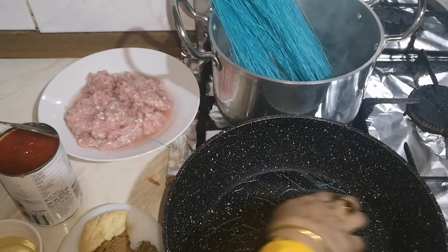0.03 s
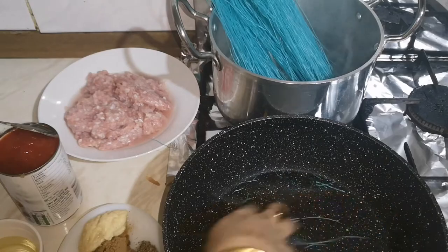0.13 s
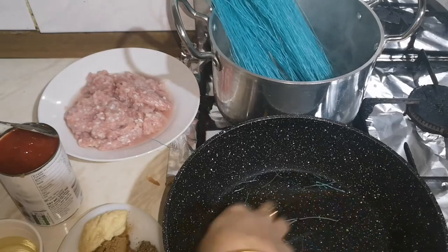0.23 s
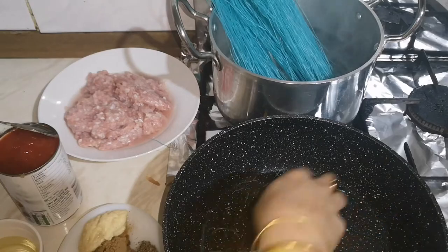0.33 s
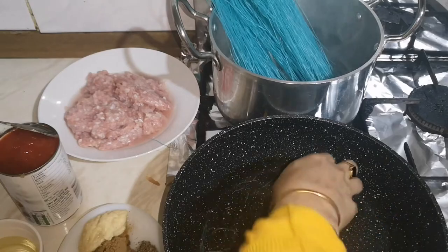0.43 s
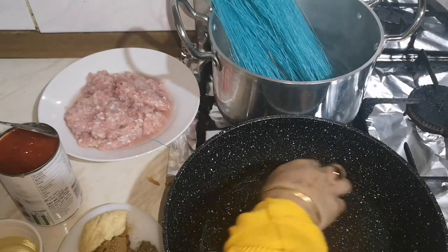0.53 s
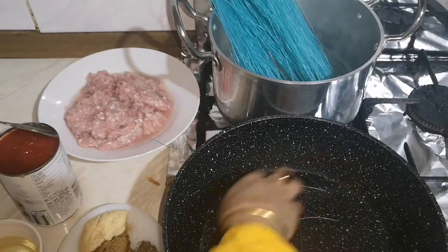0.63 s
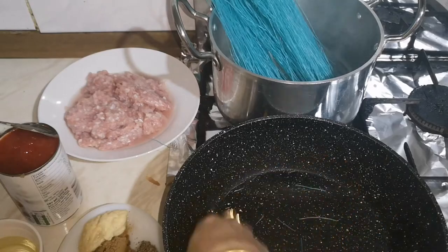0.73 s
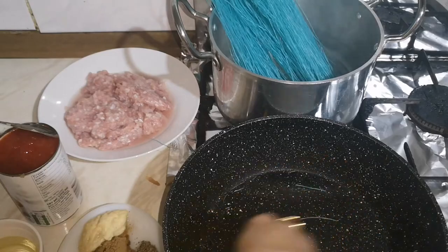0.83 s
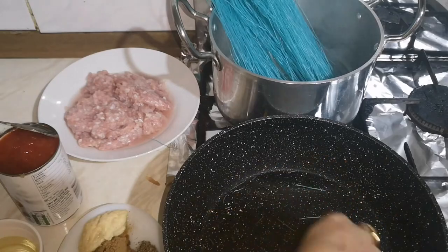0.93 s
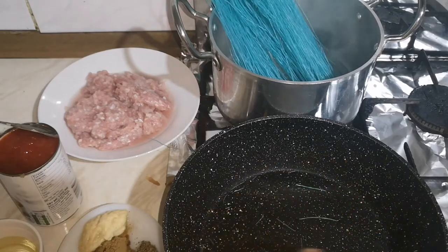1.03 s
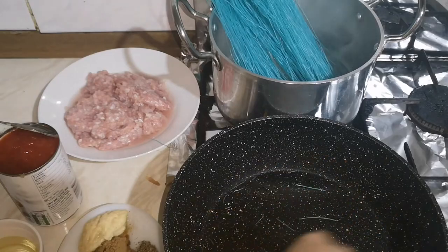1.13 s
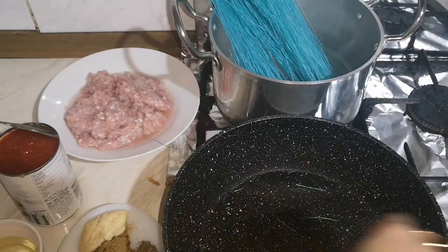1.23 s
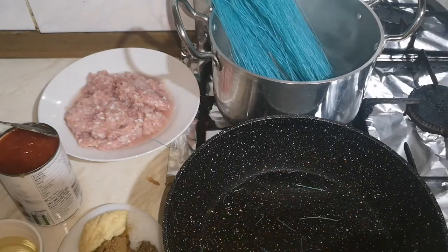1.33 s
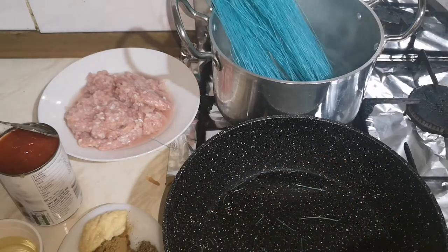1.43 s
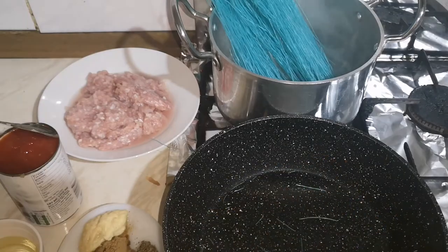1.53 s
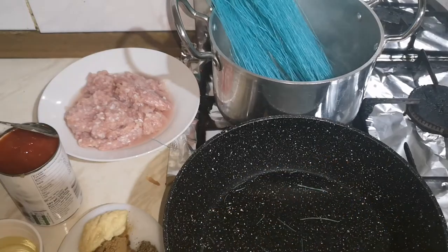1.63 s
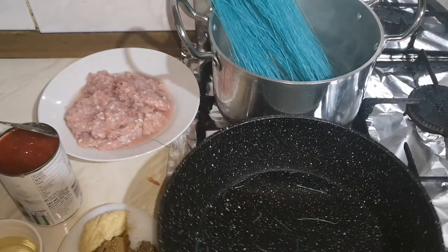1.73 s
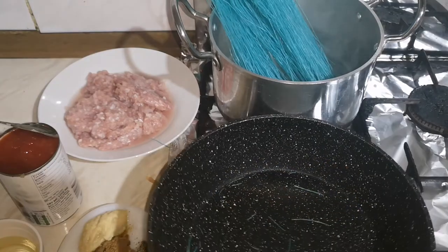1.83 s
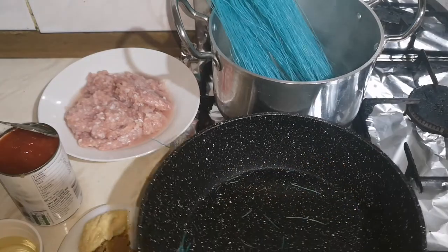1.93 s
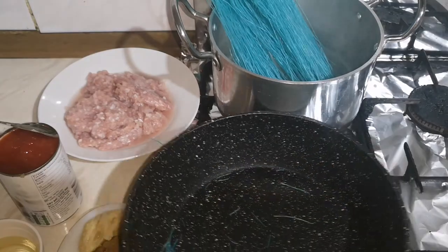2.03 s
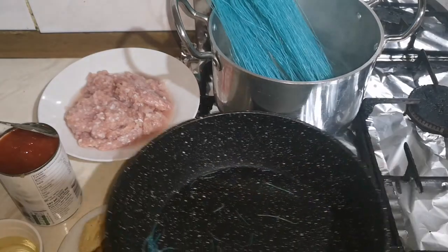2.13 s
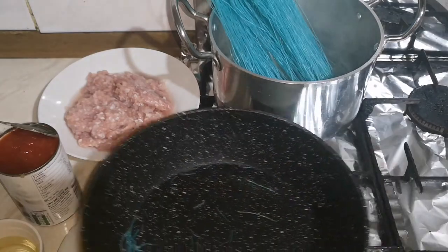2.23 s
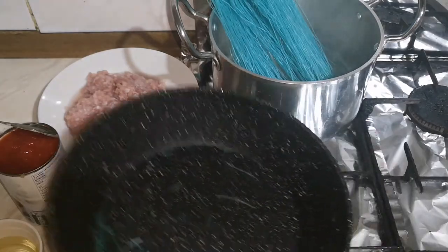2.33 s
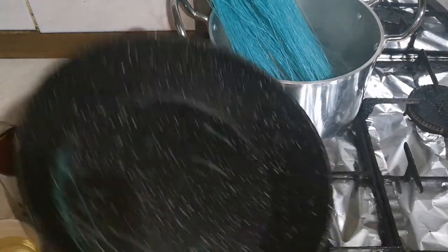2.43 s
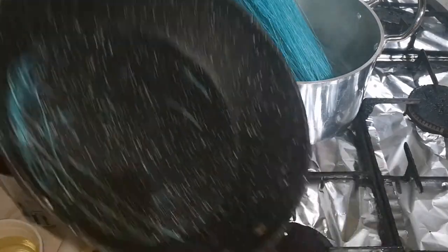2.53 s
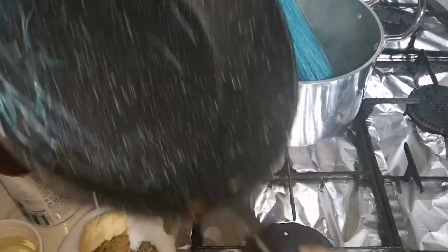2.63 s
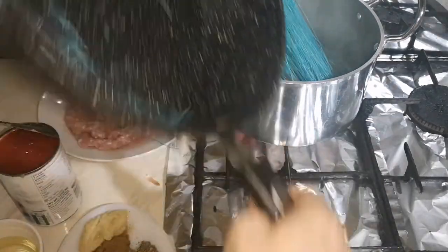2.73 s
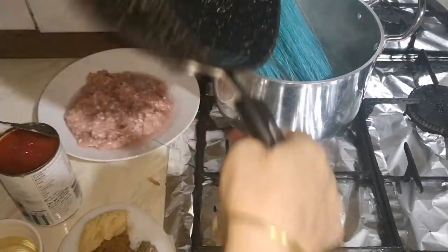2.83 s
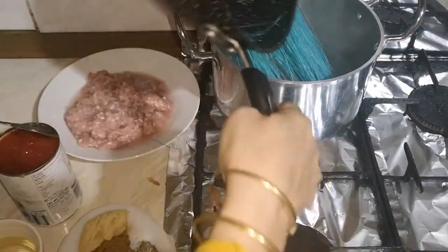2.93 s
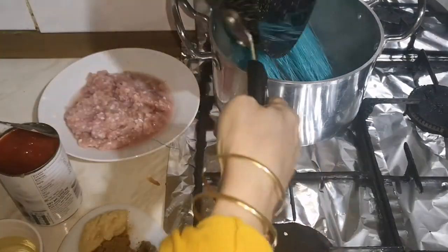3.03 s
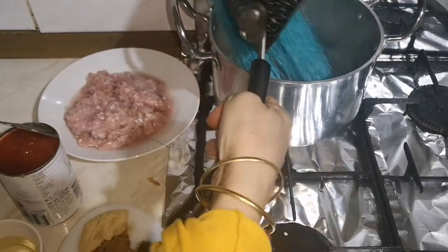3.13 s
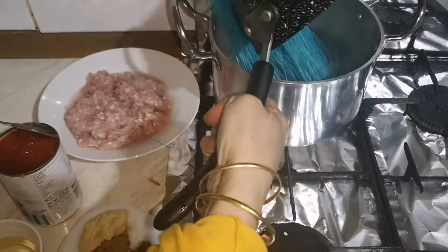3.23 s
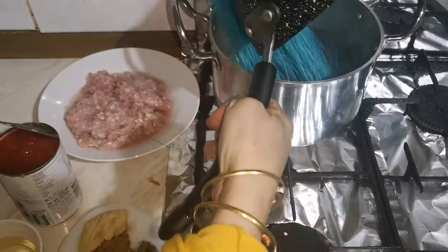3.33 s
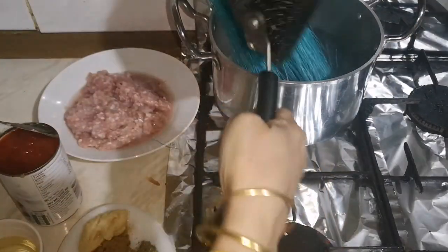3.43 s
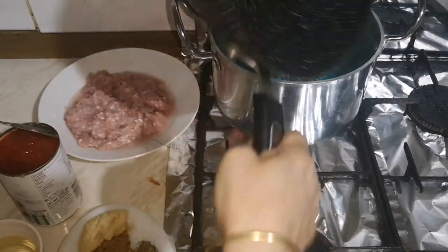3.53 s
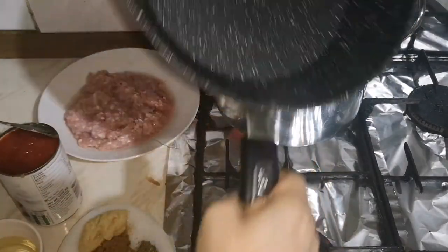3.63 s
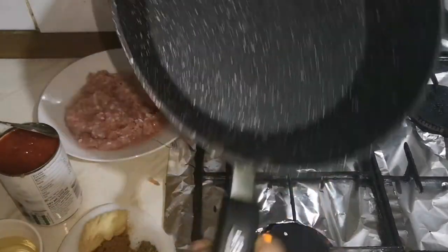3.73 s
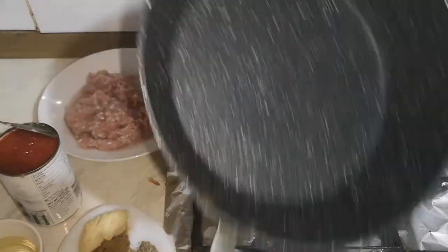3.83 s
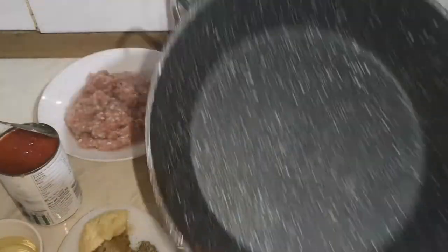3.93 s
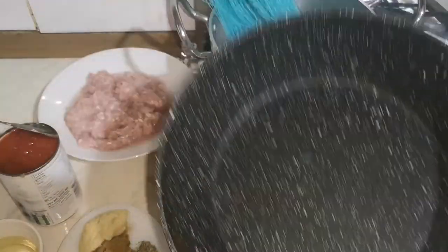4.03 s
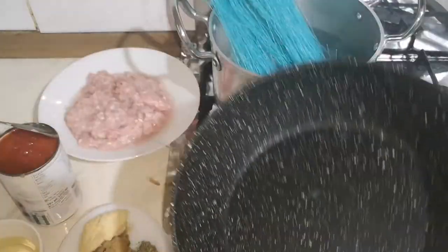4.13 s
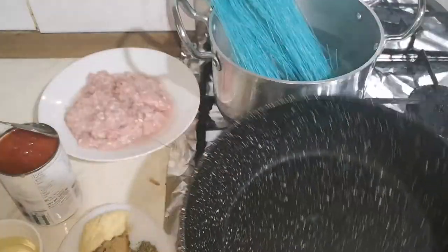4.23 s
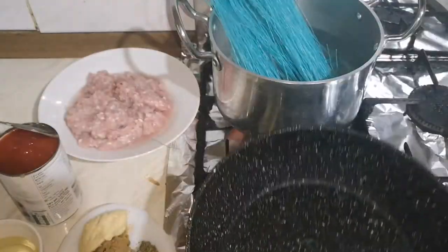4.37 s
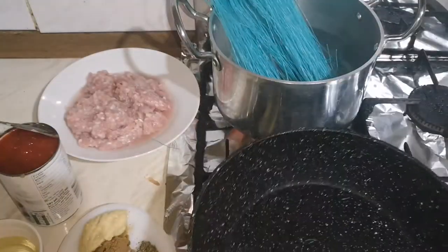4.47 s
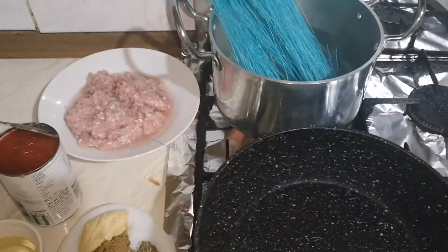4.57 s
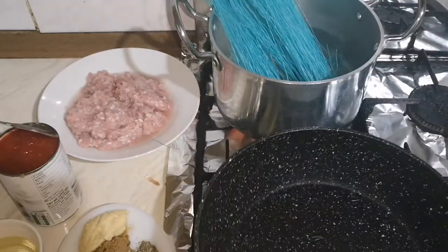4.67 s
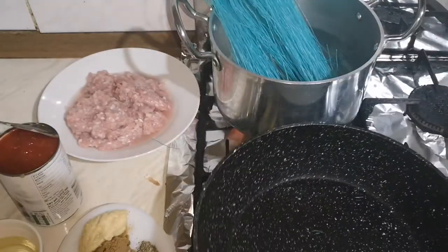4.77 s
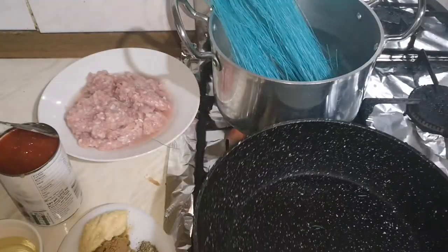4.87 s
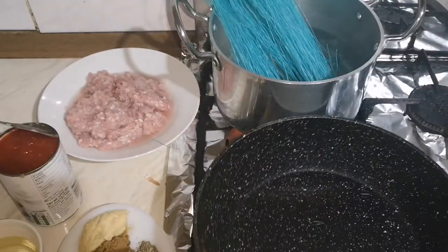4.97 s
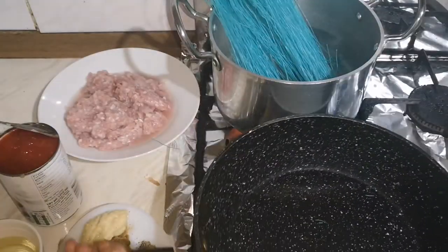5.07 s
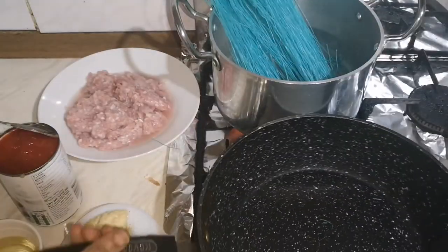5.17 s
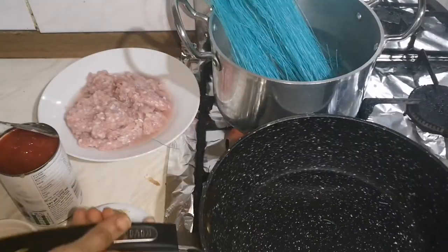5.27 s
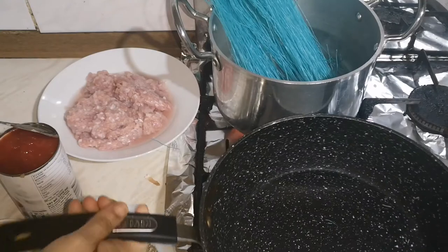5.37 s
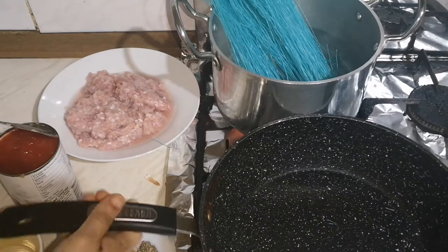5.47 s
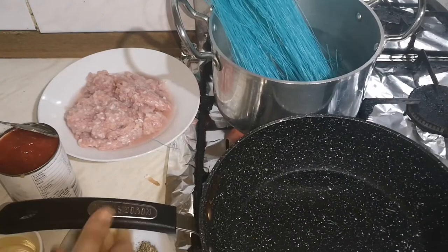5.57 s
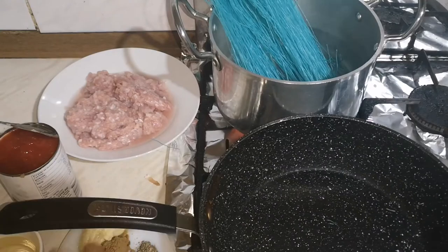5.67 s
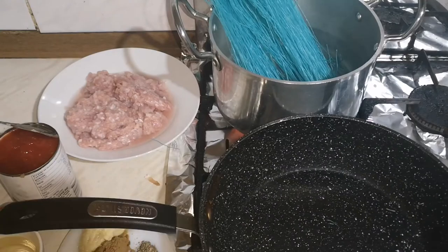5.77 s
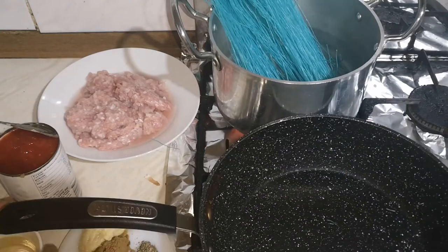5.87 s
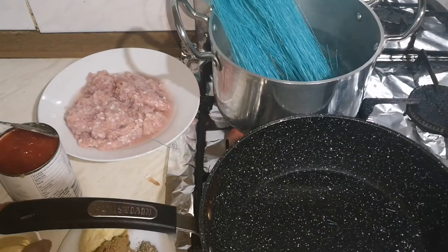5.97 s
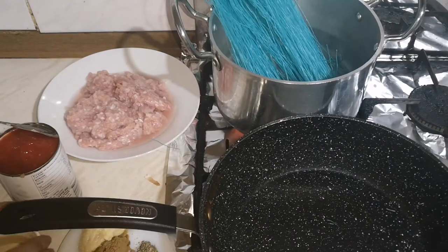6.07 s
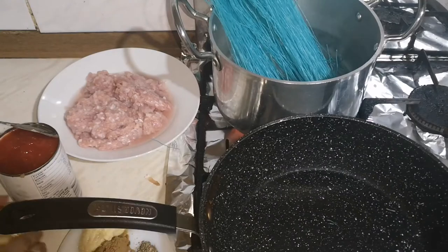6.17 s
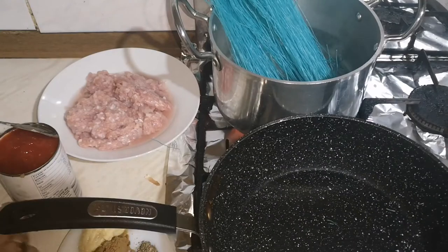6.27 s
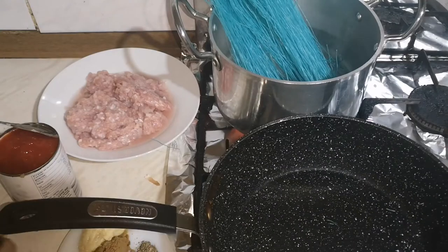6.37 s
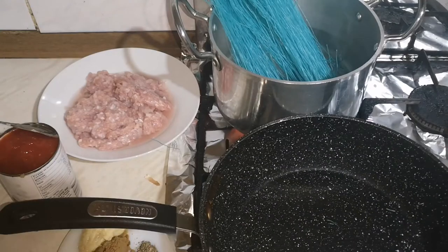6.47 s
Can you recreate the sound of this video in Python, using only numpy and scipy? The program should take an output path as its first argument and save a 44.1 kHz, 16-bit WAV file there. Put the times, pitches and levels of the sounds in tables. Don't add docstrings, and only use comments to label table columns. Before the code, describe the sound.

Close up in a small, fairly dry kitchen, fingertips rub the coated inside of a frying pan in short hissing, ringing strokes. The pan drags softly over an iron stove grate with small taps, then goes nearly quiet while lifted, with faint ticks and a cluster of dry brushing flicks. It is set down with a sudden loud, bouncing clatter, shifts slightly, and leaves a quiet low room hum.

```python
import sys
import numpy as np
from scipy import signal
from scipy.io import wavfile
from scipy.ndimage import uniform_filter1d

SR = 44100
rng = np.random.default_rng(int(sys.argv[2]) if len(sys.argv) > 2 else 0)


def gain_from_decibels(decibels):
    exponent = np.asarray(decibels, float) / 20
    return 10 ** exponent


def to_wav(sig):
    pcm = np.clip(np.atleast_2d(sig), -1, 1) * 32767
    pcm = np.round(pcm).astype(np.int16)
    wavfile.write(sys.argv[1], SR, pcm.T)


N = 286729
TIME = np.arange(N) / SR


def add(mix, start, sound):
    mix[:, start:start + sound.shape[1]] += sound


def evened(x):
    return x / np.sqrt(np.mean(x ** 2) + 1e-20)


def read(points, hz):
    f, value = np.transpose(points)
    return np.interp(np.log(hz + 1), np.log(f + 1), value)


FINE = uniform_filter1d(rng.standard_normal(2049), 5) * np.sqrt(5)


def coloured(x, points, fine_db):
    gain_db = read(points, np.fft.rfftfreq(4096, 1 / SR)) + fine_db * FINE
    both_sides_db = np.r_[gain_db, gain_db[-2:0:-1]]
    log_gain = np.log(gain_from_decibels(np.maximum(both_sides_db, -100)))
    spectrum = np.exp(np.conj(signal.hilbert(log_gain)))
    taps = np.fft.ifft(spectrum).real[:2048]
    return signal.oaconvolve(x, taps[None] / np.linalg.norm(taps), axes=1)[:, :x.shape[1]]


def mode(x, hz, width_hz, turn, skirt_hz=260):
    step = np.exp(2j * np.pi * hz / SR)
    decay, soft = np.exp(-np.pi * width_hz / SR), np.exp(-np.pi * skirt_hz / SR)
    ring = signal.lfilter([1 - soft], np.convolve([1, -step * decay], [1, -step * soft]), x)
    return np.array([(ring * np.exp(1j * turn)).imag, (ring * np.exp(-1j * turn)).imag])


def grit(per_s, spread_db, size):
    height = gain_from_decibels(spread_db * np.minimum(rng.exponential(1, (2, size)), 5))
    sign = rng.choice([-1, 1], (2, size))
    return evened(height * sign * (rng.random((2, size)) < per_s / SR))


def pressure_db(t, top_s, rise_s, fall_s, bend):
    away = np.where(t < top_s, (top_s - t) / rise_s, (t - top_s) / fall_s)
    return -30 * away ** bend


# pitch_hz, width_hz, wiped_db, dragged_db, lifted_db, struck_db
PAN = [(466.6, 6.7, -52.5, -9.5, -23, -28.5), (617, 6.8, -14, -1, -5.5, -3),
       (776.7, 48, -8, -5.5, -16, -3.5), (1078, 35, -23, -3, -4, 2.5), (1189.3, 32, -1, -4.5, 5, 2),
       (1173.2, 15, 2.5, 0, -12.5, 1), (1698, 50, -18.5, -6, -20.5, -1.5), (1802, 31, -13, -9, -2, -6),
       (1901.5, 30, 1.5, -0.5, 6, 2), (1922, 21, -5, -13.5, -7.5, -8), (2432, 30, -7.5, -11, -1, -17),
       (2760, 18, -18, -24, -13, -15.5), (2890, 23, -11, -14, -0.5, -5.5), (3422, 30, -9, -15, 1.5, -5),
       (4030, 24, -16.5, -17, 2, -14), (4693, 100, -14.5, -23, 5, -10), (5274, 45, -9, -11, 1.5, -6.5),
       (6040, 72, -33, -4.5, 4, -10.5), (6330, 51, -12, -34, -10, -10), (6900, 67, -19.5, -40, 2, -15.5)]
# pitch_hz, width_hz, level_db
STOVE = [(50.3, 39, -8.5), (65, 40, -6.5), (111.5, 14, 3), (154.6, 16, -10), (195, 6, -13.5),
         (290.2, 11, -11)]
# pitch_hz, level_db (per Hz)
SKIN = [(880, -41), (1500, -15), (1860, -19), (2090, -31.5), (3540, -11), (3830, -10), (4310, -10.5),
        (5140, -2), (7520, 4.5), (15500, -25)]
# pitch_hz, level_db (per Hz)
CRACK = [(150, -52), (250, -19.5), (635, -10), (1030, -9.5), (1180, -36), (1360, -6.5), (1890, -8.5),
         (4170, -17), (7000, -16), (15500, -48)]


def rubbing(strokes, span_s, column, damping, scrape_db, wander_db, bend, low_db, hiss_db, rumble_db, side_db):
    start, stop = np.round(np.multiply(span_s, SR)).astype(int)
    t, size = np.arange(start, stop) / SR, stop - start
    power = np.zeros((4, size))
    for top_s, rise_s, fall_s, ring_db, soft_db in strokes:
        press_db = pressure_db(t, top_s, rise_s, fall_s, bend)
        late_db = pressure_db(t, top_s, rise_s, 1.43 * fall_s, bend)
        lost_db = 0.45 * soft_db
        levels_db = np.array([press_db,
                              press_db + low_db - lost_db,
                              0.95 * press_db + hiss_db + soft_db,
                              late_db + rumble_db - lost_db])
        power += gain_from_decibels(ring_db + levels_db) ** 2
    high, low, dry_hiss, shake = np.sqrt(power)

    slips, knots = grit(2500, 3.5, size), np.arange(0, size + 3000, 3000)
    pan = gain_from_decibels(scrape_db) * high * coloured(grit(4000, 1.4, size), CRACK, 0.73)
    for k, row in enumerate(PAN):
        hz, width_hz = row[0], damping * row[1]
        wander = gain_from_decibels(wander_db * np.interp(np.arange(size), knots, rng.standard_normal(len(knots))))
        drive = (low if hz < 1400 else high) * wander * slips[0]
        unit = np.sqrt(4 * np.pi * width_hz / SR)
        pan += gain_from_decibels(row[column] - 5) * unit * mode(drive, hz, width_hz, 1.015 * np.sin(1.916 * k + column))
    rumble = sum(gain_from_decibels(db) * np.sqrt(w) * mode(slips[1], hz, 1.64 * w, 0.09) for hz, w, db in STOVE)
    hiss = dry_hiss * coloured(grit(9000, 5.6, size), SKIN, 3.6)

    near, bass = np.zeros((2, 2, N))
    sides = gain_from_decibels([[side_db / 2], [-side_db / 2]])
    add(near, start, sides * (pan / np.sqrt(1 + gain_from_decibels(2 * scrape_db)) + hiss))
    add(bass, start, shake * evened(rumble))
    return np.array([near, bass])


# from_s, to_s
SPANS = [
    (0, 1.3),
    (1.3, 2.4),
    (4.4, 5.6),
    (2.45, 4.4),
    (5.0, 6.5),
]

# top_s (most pressure), rise_s, fall_s, ring_db, softness_db (more hiss, less low ring)
WIPES = [
    (.175, .13, 0.14, -33, 1),
    (.33, .1, 0.17, -60.5, 11.5),
    (.555, .02, 0.078, -41.5, -24.5),
    (.6, .07, 0.25, -33.5, -7.5),
    (.71, .09, 0.14, -25.5, -1.5),
    (.87, .1, 0.12, -67, 19),
    (1.08, .03, 0.1, -38.5, -9.5),
]


def wiping():
    return rubbing(WIPES, SPANS[0], column=2, damping=1.28, scrape_db=-14, wander_db=0.5, bend=1.21,
                   low_db=-6.0, hiss_db=-6, rumble_db=-18.5, side_db=0.5)


# top_s (most pressure), rise_s, fall_s, ring_db, softness_db
DRAGS = [
    (1.37, 0.028, 0.46, -67, 17),
    (1.51, 0.066, 0.14, -55.5, 10.5),
    (1.62, 0.036, 0.24, -56.5, -31),
    (1.81, 0.15, 0.2, -41, 8),
    (1.9, 0.072, 0.36, -48, -20),
    (1.975, 0.082, 0.23, -40.5, -4),
    (2.1, 0.41, 0.3, -47, 9.5),
    (2.17, 0.084, 0.035, -43, -11),
]


def dragging():
    return rubbing(DRAGS, SPANS[1], column=3, damping=1.9, scrape_db=-1.5, wander_db=6.5, bend=0.84,
                   low_db=-0.5, hiss_db=-21, rumble_db=1.5, side_db=0.5)


# top_s (most pressure), rise_s, fall_s, ring_db, softness_db
RATTLES = [
    (4.47, 0.037, 0.13, -25, 4),
    (4.605, 0.026, 0.11, -28, 8),
    (4.69, 0.1, 0.16, -25.5, -3.5),
    (4.725, 0.032, 0.11, -40, -17),
    (4.815, 0.023, 0.13, -29.5, -17),
    (4.86, .05, 0.47, -50, 2.5),
    (5.06, 0.018, 0.079, -40, 7.5),
    (5.11, 0.028, 0.1, -48, -20),
]


def rattling():
    return rubbing(RATTLES, SPANS[2], column=5, damping=2, scrape_db=3.5, wander_db=9, bend=0.84,
                   low_db=-6.0, hiss_db=-13, rumble_db=2.5, side_db=1.1)


# top_s (most pressure), rise_s, fall_s, ring_db, softness_db
LIFTED = [(2.52, 0.022, 0.39, -73, -14.5), (2.6, 0.19, 0.2, -80, 7), (2.77, 0.08, 0.25, -68.5, 6.5),
          (2.86, 0.12, 0.053, -67, 7.5), (2.93, 0.23, 0.093, -76, 17), (3.06, 0.24, 0.3, -61, 9),
          (3.16, 0.2, 0.11, -67.5, 14), (3.825, 0.091, 0.16, -63.5, -4.5), (4.02, 0.094, 0.33, -74, -3.5),
          (4.09, 0.025, 0.069, -60.5, -2), (4.155, 0.0086, 0.096, -58, -25.5)]


def lifted():
    return rubbing(LIFTED, SPANS[3], column=4, damping=1.1, scrape_db=-1, wander_db=3.5, bend=1.44,
                   low_db=-1.0, hiss_db=4.5, rumble_db=-2.5, side_db=2.0)


# top_s (most pressure), rise_s, fall_s, ring_db, softness_db
SETTLING = [
    (5.19, 0.3, 0.19, -50, -13.5),
    (5.31, 0.24, 0.082, -52, -4),
    (5.42, 0.18, 0.45, -61, -10.5),
    (5.52, 0.067, 0.068, -63.5, -21),
    (6.11, 0.18, 0.21, -59.5, -9),
    (6.23, 0.25, 0.21, -70.5, 8),
]


def settling():
    return rubbing(SETTLING, SPANS[4], column=3, damping=1.07, scrape_db=-1.5, wander_db=0.5, bend=1.14,
                   low_db=-11.5, hiss_db=-4, rumble_db=0.5, side_db=0.0)


def knocks(rows, ring, crack_db):
    s, blow_db, low_db, high_db, boom_db, spot_hz = np.transpose(rows)
    at, luck = np.round(s * SR).astype(int), rng.standard_normal((len(s), len(PAN)))
    pan, push, cracks = np.zeros((2, N)), np.zeros(N), np.zeros((2, N))
    for k, (hz, width_hz, *_, db) in enumerate(PAN):
        extra_db = low_db if hz < 1400 else high_db * np.clip((hz - 2700) / 1300, 0, 1)
        spot_db = 10.0 * np.exp(-((hz - spot_hz) / 350) ** 2) + 2 * luck[:, k]
        clicks = np.zeros(N)
        clicks[at] = gain_from_decibels(blow_db + extra_db + db + spot_db - 11.5)
        damping = ring if hz < 2200 else 2 * ring
        pan += mode(clicks, hz, damping * width_hz, 0.99 * np.sin(2.0 * k), skirt_hz=500)

    t = (np.arange(2400) - 200) / SR
    shape = np.exp(np.minimum(t / 0.00017, -t / 0.0056))
    shape += 0.12 * (t > 0) * np.exp(-t / 0.023)
    burst = rng.standard_normal((len(s), 2, 2400)) * shape
    for k, i in enumerate(at - 200):
        add(cracks, i, gain_from_decibels(blow_db[k] + 0.5 * high_db[k] + crack_db) * burst[k])

    push[at] = gain_from_decibels(blow_db + boom_db - 3.5)
    push = signal.oaconvolve(push, signal.windows.hann(600) / 200)[:N]
    boom = sum(gain_from_decibels(db) * mode(push, hz, width_hz, 0.05) for hz, width_hz, db in STOVE)
    return np.array([pan + coloured(cracks, CRACK, 2.2) * gain_from_decibels([[-1.2], [1.2]]), boom])


# start_s, blow_db, low_modes_db (more), high_modes_db (more), boom_db (more)
TAPS = [(0.5424, -33.5, -8, -14, -6), (0.5751, -23.5, -22, -13, -14), (1.07, -35, 5.5, -32, -27),
        (1.3581, -53, -16, 0.5, -18), (1.6023, -29.5, 4.5, -53, 10.5), (1.727, -48.5, 4.5, -28, 18),
        (1.7606, -34, -4, -25, -23), (1.8797, -46, 17.5, -29, -18), (1.903, -27, 0, -31, -27),
        (1.9656, -24.5, -7, -47, -37), (2.141, -47, 17, -16, -11), (5.055, -33.5, 5, -5, 18),
        (5.2951, -37.5, -23, -9.5, 8)]
# start_s, blow_db, off_main_db (modes off the main pair, more), boom_db (more), favoured_hz
CLATTER = [
    (4.4329, -11.5, 1.5, -36, 4730),
    (4.4343, -0.5, 0, -19.5, 5230),
    (4.4632, -8, -1, -23.5, 4680),
    (4.5975, -7, 2, -11, 4030),
    (4.6616, -12, 9, -15, 5230),
    (4.693, -12.5, -14, -9, 4070),
    (4.7172, -18.5, 9, 2, 3930),
    (4.8054, -5, -12.5, -13, 5500),
]


def on_grate():
    taps = [(*row, 5250) for row in TAPS]
    bounces = [(s, db, off_db - 11.5, off_db, boom_db, hz) for s, db, off_db, boom_db, hz in CLATTER]
    return knocks(taps + bounces, ring=1.19, crack_db=-11)


# start_s, blow_db, low_modes_db (more), high_modes_db (more), favoured_hz
TICKS = [
    (0.4245, -58, -7, 0, 6900),
    (2.5116, -63.5, 9, 30.5, 4680),
    (2.845, -77, -24, -20, 1930),
    (3.8108, -52.5, 0, 23, 4740),
    (4.0843, -54, 19.5, 29.5, 6330),
    (4.1498, -50.5, 1.5, 18, 2890),
]


def in_air():
    return knocks([(*row[:4], -np.inf, row[4]) for row in TICKS], ring=0.68, crack_db=-13)


# start_s, level_db, t60_s (dies by 60 dB), left_right_db
BRUSHES = [(0.4259, -43, 0.12, -2.5), (3.3788, -29.5, 0.12, -22), (3.3808, -25.5, 0.27, 3),
           (3.4025, -22, 0.13, 1), (3.4244, -37, 0.41, -3), (3.459, -25.5, 0.079, -4),
           (3.484, -18, 0.11, -3.5), (3.508, -30.5, 0.17, 5), (3.6127, -43.5, 0.27, -3),
           (3.6418, -47, 0.1, 6), (5.294, -40.5, 0.061, 9.5)]
# pitch_hz, level_db (per Hz)
BRUSH = [(240, -58), (400, -28), (1100, -21), (1910, -10), (3410, -7.5), (6890, -3), (7670, 0.5), (9500, 0),
         (14800, -20), (15500, -20)]


def brushes():
    gain = np.zeros((2, N))
    for s, db, t60, side_db in BRUSHES:
        t = np.maximum(TIME - s, 0)
        flick = gain_from_decibels(db - 12.5 - 60 * t / t60) * (1 - np.exp(-t / 0.00085))
        gain += gain_from_decibels([[side_db / 2], [-side_db / 2]]) * flick
    return gain * coloured(grit(5500, 1.9, N), BRUSH, 0.33)


# pitch_hz, width_hz, level_db
BANGLE = [(5230, 47, -9), (7660, 69, -4), (8600, 74, -7), (9770, 25.5, -1), (11400, 45, -9),
          (12500, 50, -5), (13600, 49, -15), (14400, 67, -23)]
# rise_s, fall_s, level_db
SQUEAK = (0.087, 0.085, -54.5)


def bangle():
    slips = grit(2900, 4.4, N)[0]
    lines = sum(gain_from_decibels(db) * mode(slips, hz, 1.15 * width_hz, 0.98, skirt_hz=504) * np.sqrt(width_hz)
                for hz, width_hz, db in BANGLE)
    rise_s, fall_s, squeak_db = SQUEAK
    level_db = squeak_db + pressure_db(TIME, 5.815, rise_s, fall_s, bend=1.3)
    scratch = coloured(slips * np.ones((2, 1)), BRUSH, 0.95)
    return gain_from_decibels(level_db) * (evened(lines) + 0.35 * scratch)


# pitch_hz, t60_s
KITCHEN = [(150, 0.13), (700, 0.09), (2000, 0.099), (5000, 0.051), (12000, 0.071)]


def kitchen(x):
    taps = np.zeros((2, SR // 2))
    starts = np.arange(120, SR // 2 - 20, 20)
    at = starts + rng.integers(0, 20, (2, len(starts)))
    np.put_along_axis(taps, at, rng.choice([-1., 1.], at.shape), 1)
    hz, t, z = signal.stft(taps, SR, nperseg=256)
    fade = gain_from_decibels(-60 * t / read(KITCHEN, hz)[:, None])
    tail = signal.istft(z * fade, SR, nperseg=256)[1]
    return signal.fftconvolve(x, tail / np.linalg.norm(tail[0]), axes=1)[:, :N]


# pitch_hz, level_db (per Hz)
HUM = [(12, -24.5), (20, 0.5), (112, -6), (333, -22.5), (393, -25), (649, -28), (788, -31), (1040, -26.5),
       (1160, -32.5), (1380, -34.5), (2610, -30), (3450, -39.5), (4310, -38.5), (6360, -40), (15500, -52.5)]
# pitch_hz, likeness (1 is the same)
SAME = [(60, 1.), (200, 0.98), (400, 0.08), (1000, 0.56), (4000, 0.067)]


def hum():
    frames, hz = N // 512 + 5, np.fft.rfftfreq(2048, 1 / SR)
    a, b, c, d, patches = rng.standard_normal((frames, 1025, 5)).T
    patches = evened(uniform_filter1d(uniform_filter1d(patches, 20, 0), 8, 1))
    same = np.clip(read(SAME, hz), -1, 1)[:, None]
    left, other = a + 1j * b, c + 1j * d
    z = np.array([left, same * left + np.sqrt(1 - same ** 2) * other])
    z[1] *= np.exp(-2j * np.pi * hz * 0.0006 * (hz > 250))[:, None]
    z *= gain_from_decibels(read(HUM, hz)[:, None] + 2 * patches)
    return gain_from_decibels(-55.5) * evened(signal.istft(z, nperseg=2048, noverlap=1536)[1][:, :N])


def scene():
    rub, rumble = wiping() + dragging() + rattling() + lifted() + settling()
    hits, boom = on_grate() + in_air()
    near = rub + brushes() + bangle()
    small_top = signal.butter(2, 44, "highpass", fs=SR, output="sos")
    bass = signal.sosfilt(small_top, rumble + boom)
    return near + hits + kitchen(gain_from_decibels(-4.5) * near + gain_from_decibels(-9.0) * hits) + bass + hum()


def band_limit(x):
    return signal.sosfilt(signal.butter(12, 16320, fs=SR, output="sos"), x)


def record(dry):
    edge = signal.firwin(301, 15550, window=("kaiser", 8), fs=SR)
    x = signal.sosfilt(signal.butter(2, 36, "highpass", fs=SR, output="sos"), dry)
    x = 1.3 * np.tanh(x / 1.3)
    mix = signal.oaconvolve(x, edge[None], "same", axes=1)
    return band_limit(mix)


dry = scene()
out = record(dry)
to_wav(out)
```